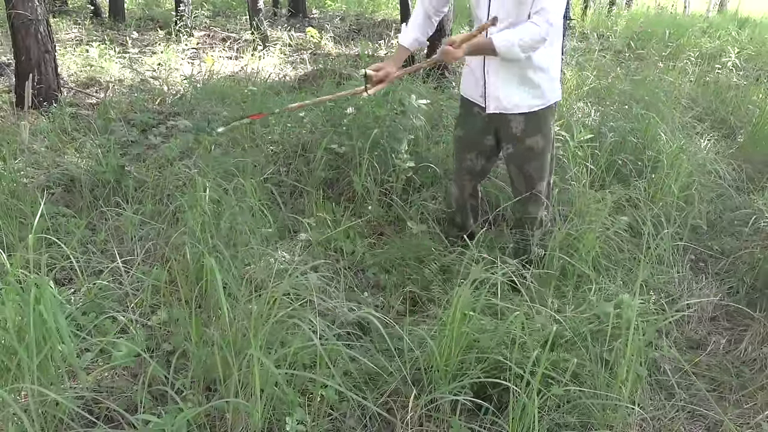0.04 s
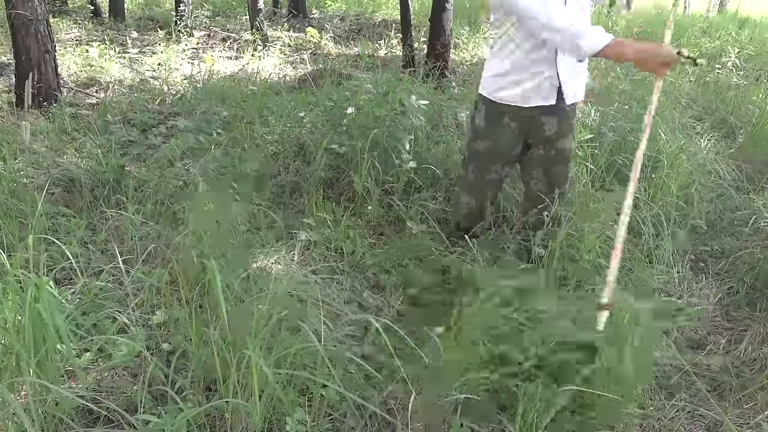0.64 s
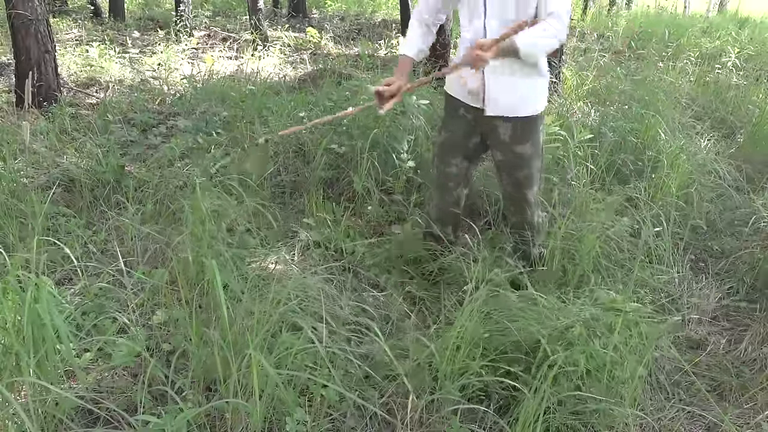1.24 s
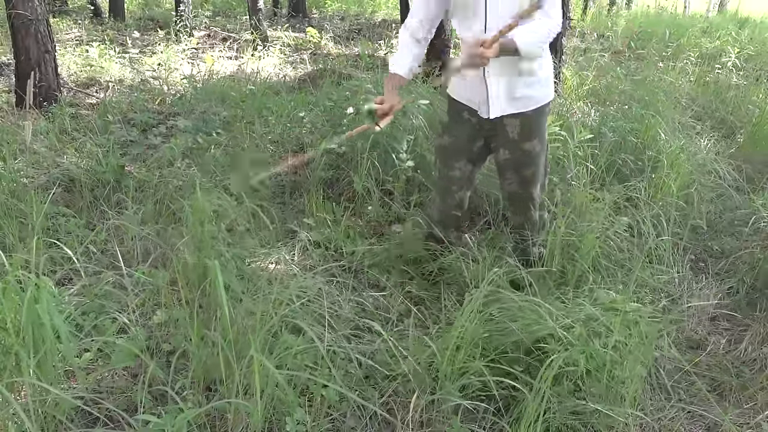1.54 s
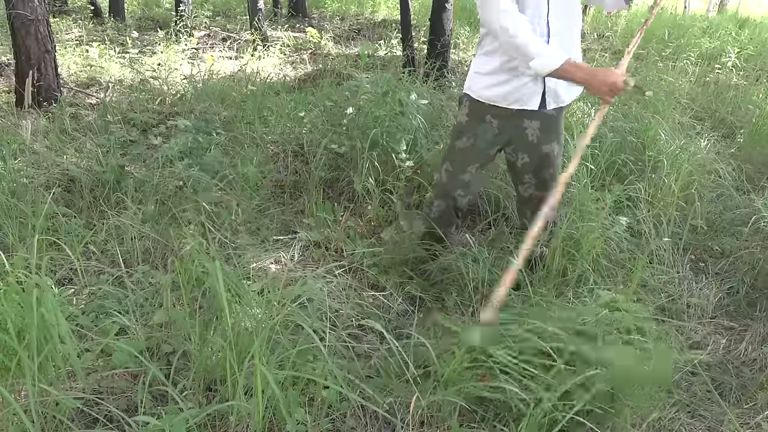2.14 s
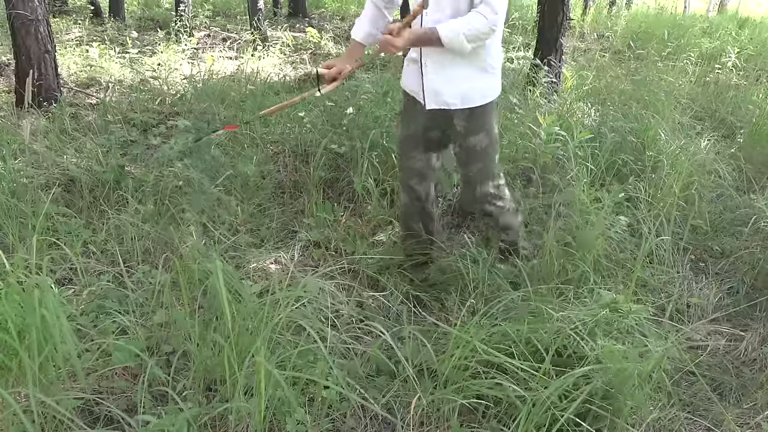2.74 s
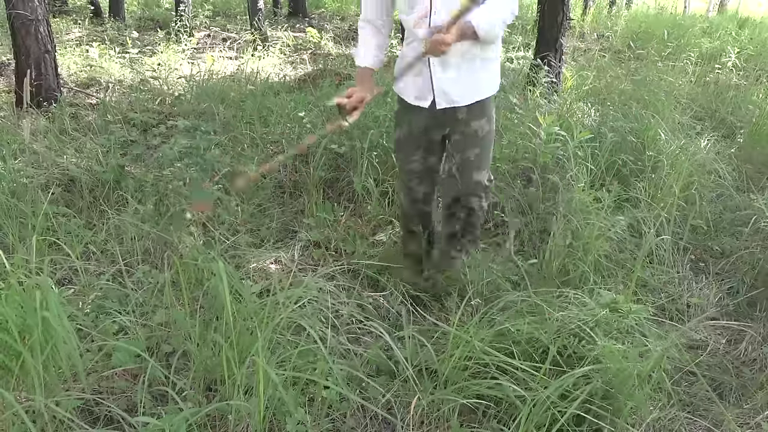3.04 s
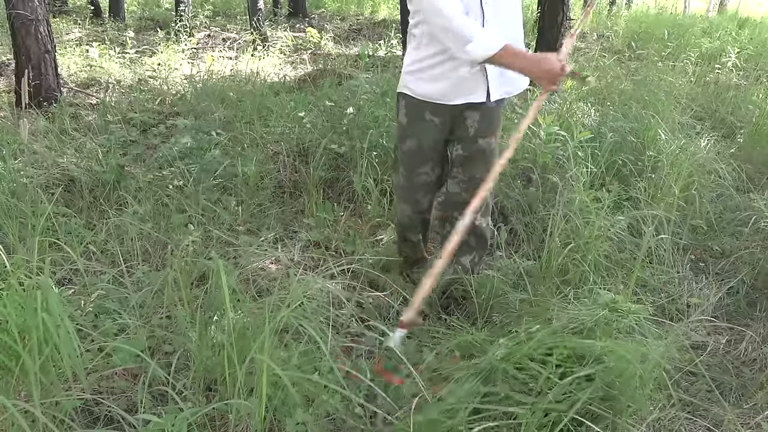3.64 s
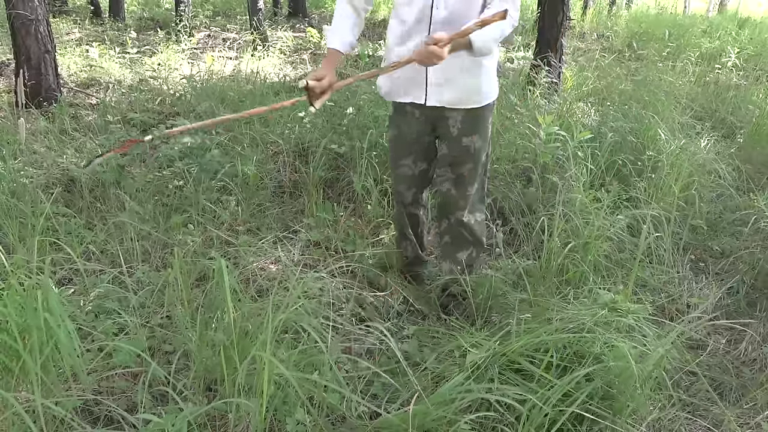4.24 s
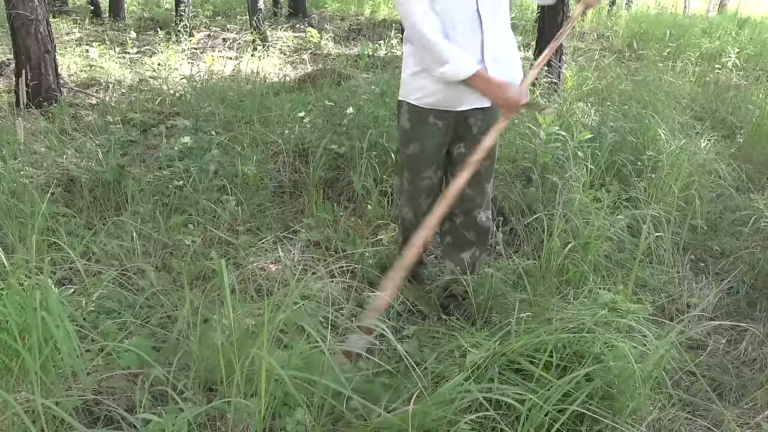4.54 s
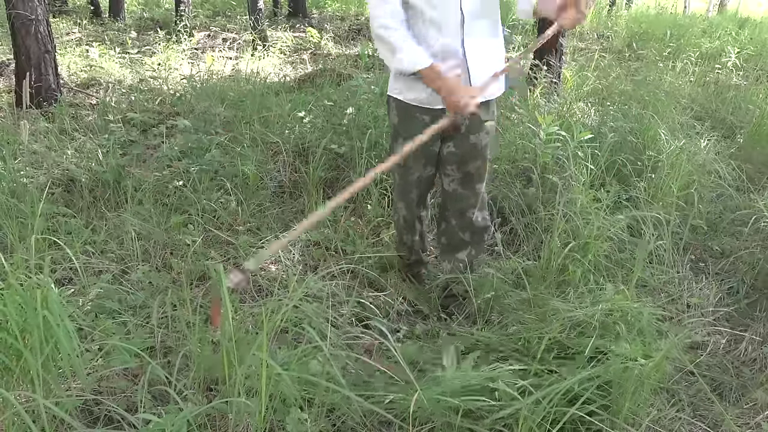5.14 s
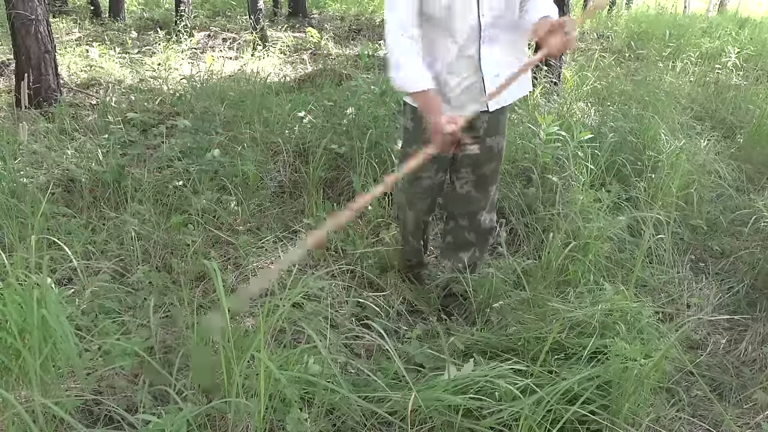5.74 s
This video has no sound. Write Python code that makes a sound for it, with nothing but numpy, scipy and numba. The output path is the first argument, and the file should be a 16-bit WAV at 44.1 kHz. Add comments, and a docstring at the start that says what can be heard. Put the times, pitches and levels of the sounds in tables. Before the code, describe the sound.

A hand scythe mows tall grass a few steps away in a forest clearing. An insect chirps faintly, then the first stroke swishes and tears through the stems, lightly ringing the thin blade. Stalks snap and the blade rustles back over the cut grass. After the second stroke the mower steps on and the insect chirps again. Two more strokes follow, then the start of a fifth, over softly rumbling air.

```python
"""A hand scythe mows tall grass in a forest clearing, a few steps away, over a hush of trees and rumbling air.
An insect chirps faintly, then the first stroke tears through tufts of stems and rings the thin blade.
Stalks snap here and there, and the blade brushes back over the swath. After the second stroke the mower
steps on and the insect chirps again; two more strokes follow, then the start of a fifth."""
import sys
import numpy as np
from scipy import signal
from scipy.fft import rfft, irfft
from scipy.io import wavfile
from scipy.ndimage import uniform_filter1d
from numba import njit

SR = 44100
rng = np.random.default_rng(int(sys.argv[2]) if len(sys.argv) > 2 else 0)


def to_wav(s):
    """Save 16-bit WAV."""
    ch = np.atleast_2d(s).T  # columns
    pcm = np.round(np.clip(ch, -1, 1) * 32767)  # PCM
    wavfile.write(sys.argv[1], SR, pcm.astype(np.int16))


N = 256220
TIME = np.arange(N) / SR
TOP_HZ = 15900

# bright tone of rustling leaves: f/Hz, gain/dB
LEAF_SPECTRUM = [(300, -34.5), (1000, -20.5), (1900, -15.5), (2700, -9), (3400, -7.5), (4200, -2.5),
                 (5600, -3.5), (6400, 0.5), (7500, -4.5), (8800, -7), (10300, -12.5), (13000, -14.5),
                 (16000, -19.5)]
# scythe strokes: entry t/s, full-speed t/s, swish/dB, bite/dB, follow-through/s,
# first bend gain/dB, second bend gain/dB, edge ring gain/dB
SCYTHE_STROKES = [(.125, 0.318, -16.5, -31.5, 0.31, 3.5, -5, 5.5),
                  (1.547, 1.702, -17, -28, 0.35, -6.5, -4, 2.5),
                  (3.003, 3.124, -19, -28.5, 0.31, -2.5, -10, 6.5),
                  (4.445, 4.55, -17, -30.5, 0.33, -7, -8, -5), (5.726, 5.834, -18.5, -32, .35, -11, -4, -5)]
# ringing modes of the blade's thin edge: f/Hz, width/Hz, gain/dB
EDGE_MODES = [(1480, 98, 2.4), (2070, 72, 6.6), (2684, 350, 6.7), (2980, 110, 2.4), (4980, 370, 11.2),
              (5760, 200, 10.5), (6660, 140, 8.5)]


def undb(db):
    """Decibels to gain."""
    return 10 ** (np.asarray(db) / 20)


def unit(x):
    """Scale to rms 1."""
    return x / np.sqrt(np.mean(x ** 2))


def together(levels_db):
    """Level of several independent sounds at once, in dB."""
    return 10 * np.log10(sum(undb(db) ** 2 for db in levels_db) + 1e-12)


def swell(s, half_s):
    """A bell-shaped rise and fall around time s, in dB."""
    return -10 * np.log10(np.e) * ((TIME - s) / half_s) ** 2


def flutter(rate_hz):
    """A modulator gliding between random values, rms 1."""
    hold = max(int(SR / rate_hz), 2)
    return unit(uniform_filter1d(rng.standard_normal(N)[np.arange(N) // hold], hold))


def colour(x, points, size=4096):
    """Minimum-phase EQ through (f/Hz, gain/dB) points, built from the cepstrum."""
    hz, db = np.transpose(points)
    bins = np.maximum(np.fft.rfftfreq(size, 1 / SR), 1)
    gains = undb(np.interp(np.log(bins), np.log(hz), db))
    cepstrum = irfft(np.log(gains))
    cepstrum[1:size // 2] *= 2
    cepstrum[size // 2 + 1:] = 0
    return signal.fftconvolve(x, irfft(np.exp(rfft(cepstrum))))[:len(x)]


def resonate(x, hz, width_hz):
    """One resonance, gain 1 at its centre."""
    return signal.lfilter(*signal.iirpeak(hz, hz / min(width_hz, SR / 4), fs=SR), x)


def add(out, s, sound):
    """Mix a sound in at time s."""
    start = int(np.clip(s * SR, 0, N))
    out[start:start + len(sound)] += sound[:N - start]


@njit
def ring_grains(sizes, poles):
    """Every nonzero size starts a damped oscillation that runs until it has faded."""
    out = np.zeros(len(sizes))
    for i in range(len(sizes)):
        z, k = sizes[i] + 0j, i
        while k < len(out) and abs(z) > .01 * abs(sizes[i]):
            out[k] += z.real
            z, k = z * poles[i], k + 1
    return out


def crackle(per_s, spread_db, ring_s):
    """An even bed of tiny ticks, each with its own size, pitch and ring."""
    chance = np.minimum(per_s / SR, 1)
    sizes = (rng.random(N) < chance) * rng.choice([-1., 1.], N) / np.sqrt(chance)
    sizes *= undb(spread_db * np.minimum(rng.exponential(size=N), 5))
    t60_s = ring_s * np.exp(.5 * rng.standard_normal(N))
    hz = rng.uniform(0, TOP_HZ, N)
    poles = np.exp((2j * np.pi * hz - np.log(1000) / t60_s) / SR)
    return unit(ring_grains(sizes, poles))


def forest():
    """Air rumbles unevenly under the hush of the trees."""
    # dark tone of the clearing: f/Hz, gain/dB
    air_spectrum = [(20, 2.5), (45, 0.5), (100, -7.5), (170, -12), (350, -12), (700, -18), (1500, -21.5),
                    (4000, -27), (7000, -38), (11000, -56), (16000, -40)]
    air = rng.standard_normal(N) * undb(1.6 * flutter(7.7))
    return undb(-41.5) * unit(colour(air, air_spectrum))


def insect(wing_hz=3920, width_hz=280):
    """Short rasps through one narrow wing resonance."""
    # chirps: t/s, length/s, level/dB
    chirps = [(0, .13, -47), (2.819, .016, -40), (2.843, .016, -38), (2.913, 0.046, -41)]
    gate = np.zeros(N)
    for s, length_s, db in chirps:
        add(gate, s, undb(db) * np.sqrt(np.hanning(int(length_s * SR))))
    rasp = resonate(rng.standard_normal(N), wing_hz, width_hz)
    return gate * unit(resonate(rasp, wing_hz, width_hz))


def dragging(lift_db_per_s=158, settle_db=-38, settle_db_per_s=19):
    """Envelope between cuts, in dB: the blade comes back and lifts, cut grass settles, feet shuffle."""
    # feet and blade brushing standing grass: t/s, half length/s, level/dB
    brushes = [(.05, 0.071, -43), (0.988, .02, -31.5), (1.57, 0.035, -35), (2.487, 0.042, -28),
               (2.583, 0.037, -32), (2.686, 0.055, -32), (2.777, .07, -38), (2.95, 0.088, -31),
               (3.93, 0.038, -31), (4.082, 0.067, -37.5), (4.352, 0.082, -43), (4.417, 0.018, -36),
               (5.269, 0.025, -31.5)]
    # the blade dragged back over the swath: loudest t/s, level/dB, fade/(dB/s), lift-off t/s
    returns = [(0.811, -28, 19.5, 1.94), (2.25, -27, 24, 2.355), (3.65, -28, 33, 4.33),
               (5.09, -27.5, 42, 5.19)]
    levels = [db + swell(s, half_s) for s, half_s, db in brushes]
    for s, db, fade_db_per_s, lift_s in returns:
        landing_db = swell(s, half_s=.15) * (TIME < s)
        since_s = np.maximum(TIME - s, 0)
        lift_db = lift_db_per_s * np.maximum(TIME - lift_s, 0)
        levels.append(db + landing_db - fade_db_per_s * since_s - lift_db)
        levels.append(settle_db + landing_db - settle_db_per_s * since_s)
    return together(levels)


def scraping(touch_lag_s=.044):
    """The first stems of a stroke ring the free edge; dragged back, its top mode sings faintly."""
    touch_db = together([-38 + swell(entry_s + touch_lag_s, .024) for entry_s, *_ in SCYTHE_STROKES])
    touch = rng.standard_normal(N) * undb(touch_db)
    ring = sum(resonate(touch * undb(db), hz, width) for hz, width, db in EDGE_MODES)
    drag = rng.standard_normal(N) * undb(dragging() - 1)
    return ring + resonate(drag, EDGE_MODES[-1][0], width_hz=170)


def thin_stalks(swish_db, per_s=7, t60_s=.0036):
    """Thin stalks snap at random wherever the grass is moved."""
    breaks = (rng.random(N) < per_s / SR) * rng.uniform(.3, 1, N)
    decay = np.exp(-np.log(1000) * TIME[:1024] / t60_s)
    cracks = signal.fftconvolve(breaks, decay)[:N] * rng.standard_normal(N)
    return unit(colour(cracks, LEAF_SPECTRUM)) * undb(swish_db - 22)


def thick_stalks():
    """A thick stalk breaks with a broad crack and a very short ring."""
    # snaps: t/s, relative peak/dB, f/Hz, t60/s
    snaps = [(0.2292, -11, 3900, 0.0037), (.2575, -7, 6000, .005), (1.0683, -20.5, 6170, 0.0049),
             (1.315, -21.5, 5200, .005), (1.786, -3.5, 7500, 0.0051), (2.2136, -13, 6050, 0.0035),
             (2.255, -16, 6000, .003), (3.3036, -4.5, 6600, .004), (3.402, -7.5, 4000, 0.006),
             (3.4038, -3, 6750, 0.0078), (3.865, -17, 2200, 0.0066), (4.17, -15.5, 3900, .003),
             (4.191, -23, 4600, .004), (4.653, -2.5, 5800, .004), (5.2561, -8, 4000, 0.0037)]
    out, t = np.zeros(N), TIME[:1024]
    for s, db, hz, t60_s in snaps:
        burst = rng.standard_normal(len(t)) * np.exp(-np.log(1000) * t / t60_s)
        crack = colour(burst, LEAF_SPECTRUM)
        snap = unit(resonate(crack, hz, width_hz=1800)) + 1.6 * unit(crack)
        add(out, s, undb(db + 3.5) * snap / np.abs(snap).max())
    return out


def catches():
    """The blade catches a tuft and it gives way all at once: a burst of tearing fibres."""
    # short crunches: t/s, relative level/dB, length/s, f/Hz
    crunches = [(0.194, -32.5, 0.12, 2300), (0.253, -15, .011, 5960), (0.311, -12, 0.021, 5000),
                (0.994, -32, .025, 2300), (1.553, -29.5, 0.005, 2600), (1.638, -16, 0.0065, 5000),
                (1.671, -10.5, 0.021, 5000), (1.779, -10, 0.0066, 4800), (2.441, -22, 0.0073, 4600),
                (3.112, -10.5, 0.0072, 5300), (3.398, -17, 0.009, 5500), (4.467, -23.5, 0.0066, 3700),
                (4.4915, -17, 0.0034, 6500), (4.537, -13, .016, 5230), (5.73, -30, .009, 3100),
                (5.762, -23, 0.0037, 5160)]
    out, t = np.zeros(N), TIME[:4096]
    for s, db, length_s, hz in crunches:
        noise = rng.standard_normal(len(t))
        band = resonate(resonate(noise, hz, hz), hz, hz)
        fibres = unit(band + .5 * colour(noise, LEAF_SPECTRUM))
        envelope = (1 - np.exp(-t / .0011)) * np.exp(-(t / length_s) ** 2)
        add(out, s, undb(db - 1) * fibres * envelope)
    return out


def tinks():
    """A hard stalk skids on the steel and rings the nearest mode of the edge."""
    # stalks tapping the blade: t/s, level/dB, approximate f/Hz, t60/s
    taps = [(.297, -17.5, 2950, 0.071), (1.706, -9.5, 2660, 0.025), (3.147, -9, 2670, 0.045),
            (3.166, -7, 2980, .038), (3.879, -22, 6740, .02), (3.93, -28, 6780, .03),
            (3.9578, -6.5, 6640, 0.014)]
    out, t = np.zeros(N), TIME[:4096]
    for s, db, near_hz, t60_s in taps:
        hz = min((mode[0] for mode in EDGE_MODES), key=lambda mode_hz: abs(mode_hz - near_hz))
        ring = np.sin(2 * np.pi * hz * t) * np.exp(-np.log(1000) * t / t60_s)
        skid = colour(rng.standard_normal(len(t)), LEAF_SPECTRUM) * np.exp(-t / .005)
        attack = 1 - np.exp(-t / .0002)
        add(out, s, undb(db) * (ring + .5 * skid) * attack)
    return out


def swing(entry_s, full_s, follow_s, loss_db, curve):
    """The blade speeds up into the grass, then slows more and more; dB relative to full speed."""
    rise = np.clip((TIME - entry_s) / (full_s - entry_s), 1e-6, 1)
    follow_through = np.maximum(TIME - full_s, 0) / follow_s
    return 20 * np.log10(rise ** 1.77) - loss_db * follow_through ** curve


def swish_and_bite():
    """Two envelopes in dB: the swish of leaves sliding on the blade and the bite of breaking stems."""
    # the mower's steps crushing stems: t/s, half length/s, bite/dB
    steps = [(2.4, 0.066, -45), (2.65, 0.056, -47), (2.827, 0.1, -45.5)]
    # thick tufts met during a cut: t/s, half length/s, swish/dB, bite/dB
    thick_tufts = [(0.356, 0.037, -23, -35.5), (0.48, 0.024, -27, -37.5), (1.698, 0.022, -24, -26.5),
                   (1.867, 0.027, -20, -32.5), (3.183, 0.012, -16, -29.5), (3.242, 0.016, -18.5, -27),
                   (3.305, 0.0047, -20, -30), (3.417, 0.059, -21.5, -35.5), (4.559, 0.016, -17.5, -24),
                   (4.657, 0.031, -20, -32)]
    drag_db = dragging()
    swish, bite = [drag_db], [drag_db - 15]  # dragging breaks few stems
    bite += [db + swell(s, half_s) for s, half_s, db in steps]
    for entry_s, full_s, swish_db, bite_db, follow_s, *_ in SCYTHE_STROKES:
        # the bite dies away sooner than the swish
        swish.append(swish_db + swing(entry_s, full_s, follow_s, loss_db=14.5, curve=3.42))
        bite.append(bite_db + swing(entry_s, full_s, follow_s, loss_db=22, curve=1.53))
    for s, half_s, swish_db, bite_db in thick_tufts:
        swish.append(swish_db + swell(s, half_s))
        bite.append(bite_db + swell(s, half_s))
    return together(swish), together(bite)


def leaves(swish_db, tufts):
    """Leaves rub and tick on the blade, denser as it speeds up; fine dry tips flutter on their own."""
    ticks = crackle(per_s=13000 * undb(.3 * (swish_db + 25)), spread_db=2.8, ring_s=.002)
    rubbing = .35 * rng.standard_normal(N)
    rustle = unit(colour(ticks + rubbing, LEAF_SPECTRUM))
    body = signal.sosfiltfilt(signal.butter(4, 8500, fs=SR, output="sos"), rustle)
    tips_db = -.4 + .13 * (swish_db + 31.5) + .95 * flutter(220)  # a louder swish is brighter
    tips = (rustle - body) * undb(tips_db)
    return (body + tips) * undb(swish_db - .42 + .53 * tufts)


def cutting(bite_db, tufts):
    """Stems tear in bunches at the edge and ring the blade, until the gathered grass mutes the edge."""
    # broad tone of tearing stems: f/Hz, gain/dB
    stem_spectrum = [(30, 3.5), (70, 2.5), (150, 3.5), (240, 0.5), (600, -0.5), (1200, 2.5), (1800, -4),
                     (2600, 0.5), (4000, -1), (8000, 2.5), (16000, -26.5)]
    # two slow bending modes of the whole blade: f/Hz, width/Hz, gain/dB
    bend_modes = [(378.5, 51, 13.5), (780, 15, 17.5)]
    tears = crackle(per_s=9000, spread_db=2, ring_s=.00077) * undb(bite_db + 1.3 * tufts)
    strokes = np.array(SCYTHE_STROKES)
    entries_s = strokes[:, 0]
    current = np.maximum(np.searchsorted(entries_s, TIME) - 1, 0)
    *bend_db, edge_db = strokes[current, -3:].T  # each stroke bites at another spot on the blade
    flex = tears * undb(np.minimum(3.1 * (bite_db + 36.5), 0))  # only a hard bite flexes the blade
    bends = sum(resonate(flex * undb(db + spot_db), hz, width)
                for (hz, width, db), spot_db in zip(bend_modes, bend_db))
    muting_db = np.clip(55 * (TIME - entries_s[current] - .17), 0, 15)
    edge = sum(resonate(tears * undb(db + edge_db - muting_db), hz, width)
               for hz, width, db in EDGE_MODES)
    return undb(7.5) * colour(tears, stem_spectrum) + bends + edge


def scene():
    """The mowing over the forest bed, in mono."""
    tufts = flutter(140)  # the grass stands in tufts, so hiss and tearing flutter together
    swish_db, bite_db = swish_and_bite()
    mowing = leaves(swish_db, tufts) + cutting(bite_db, tufts)
    accents = thick_stalks() + thin_stalks(swish_db) + catches() + tinks()
    return (mowing + accents + insect() + forest() + scraping())[None]


def record(dry):
    """Peaks clip at full scale and a steep low-pass trims the top."""
    lowpass = signal.ellip(12, .1, 80, TOP_HZ, fs=SR, output="sos")
    return signal.sosfilt(lowpass, np.clip(dry, -1, 1))


dry = scene()
out = record(dry)
to_wav(out)
```